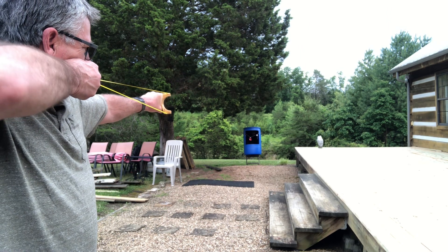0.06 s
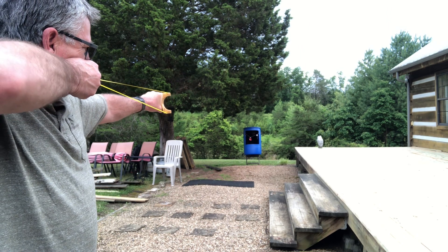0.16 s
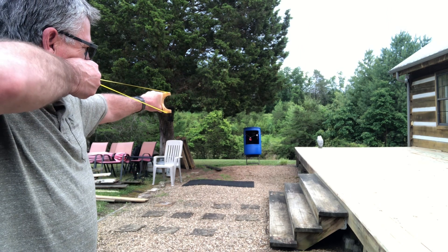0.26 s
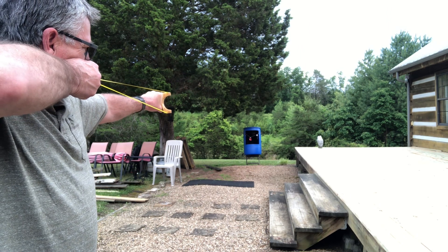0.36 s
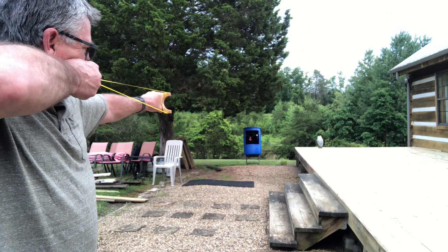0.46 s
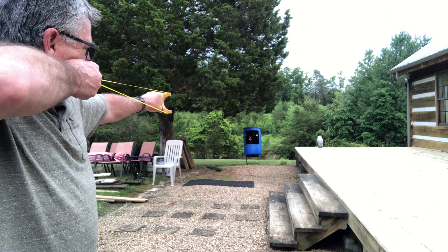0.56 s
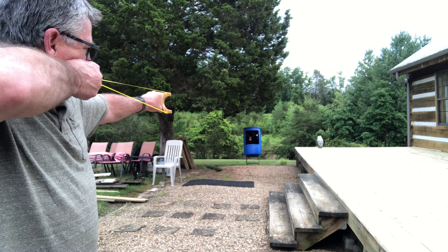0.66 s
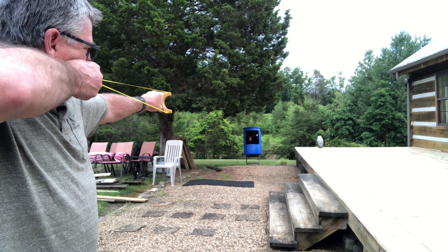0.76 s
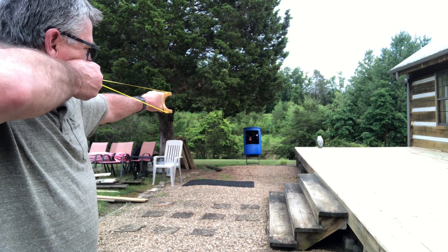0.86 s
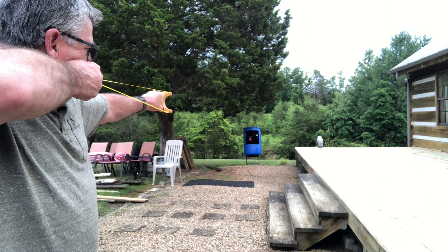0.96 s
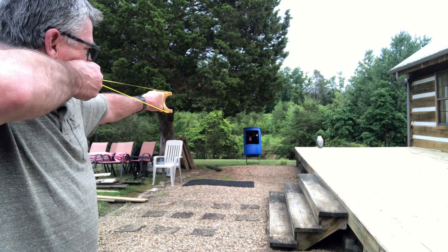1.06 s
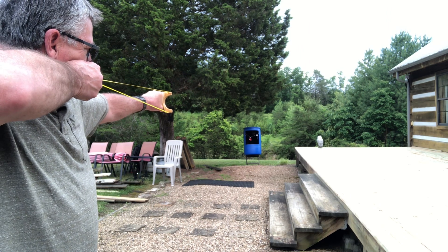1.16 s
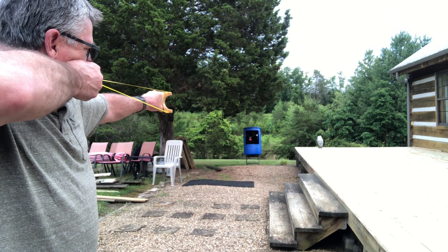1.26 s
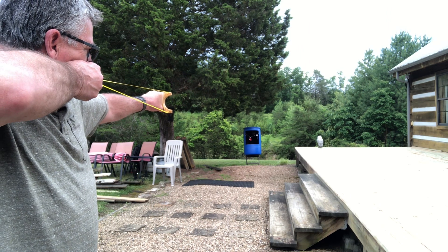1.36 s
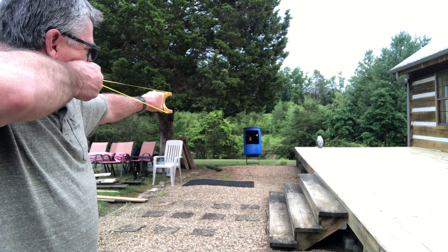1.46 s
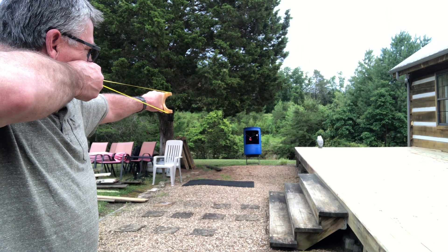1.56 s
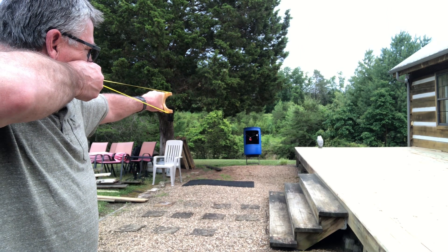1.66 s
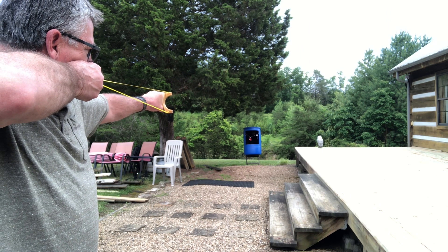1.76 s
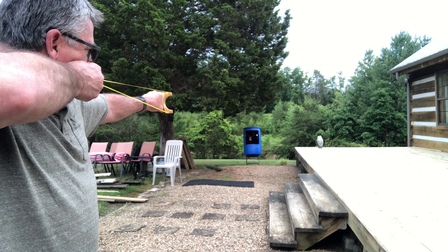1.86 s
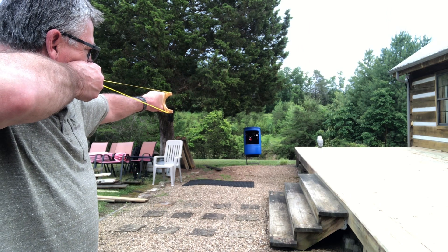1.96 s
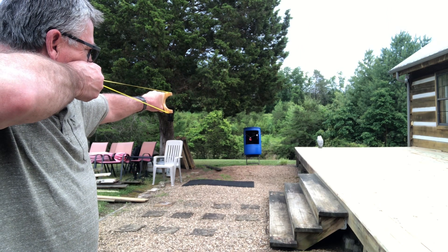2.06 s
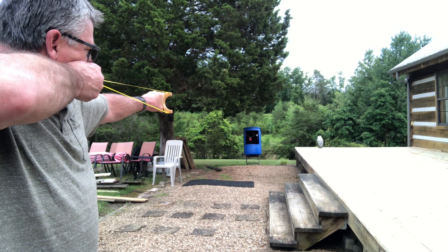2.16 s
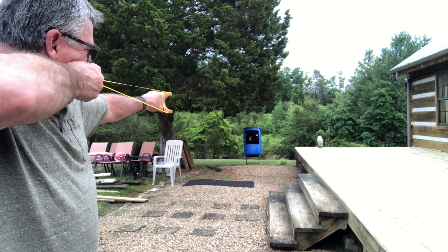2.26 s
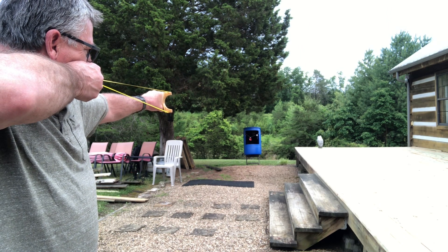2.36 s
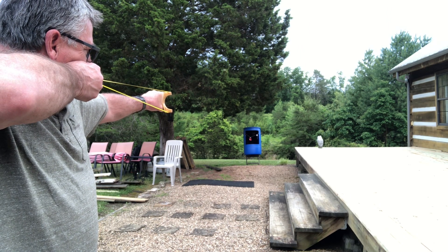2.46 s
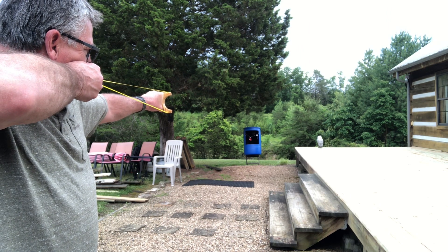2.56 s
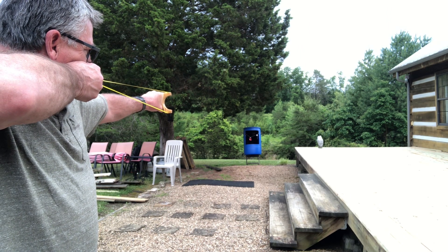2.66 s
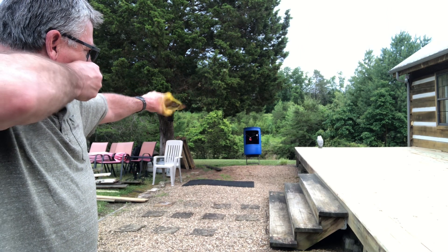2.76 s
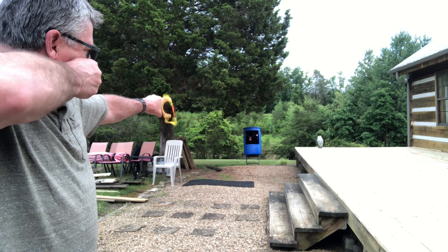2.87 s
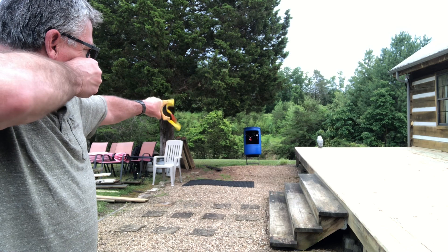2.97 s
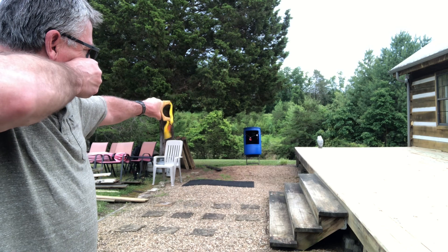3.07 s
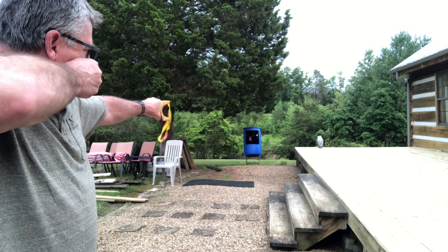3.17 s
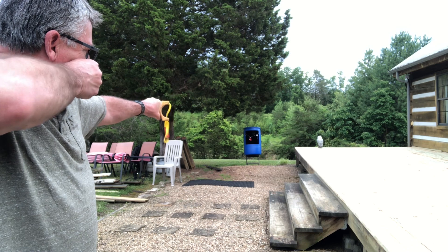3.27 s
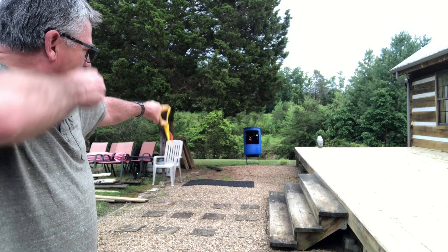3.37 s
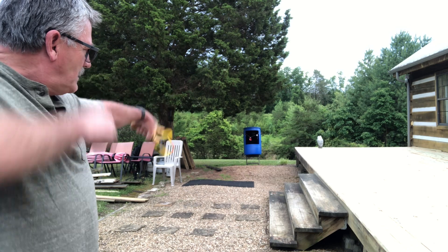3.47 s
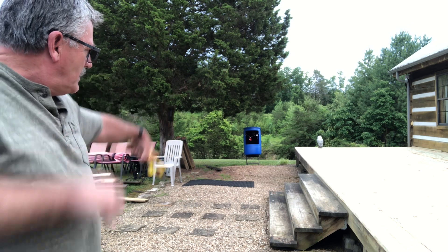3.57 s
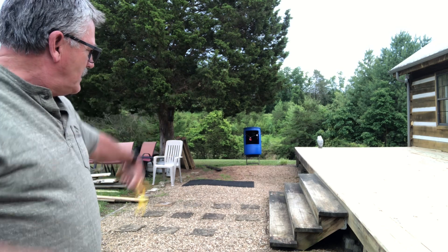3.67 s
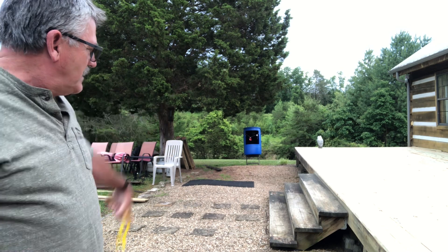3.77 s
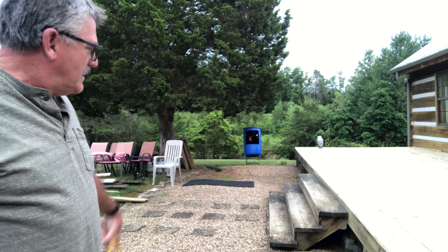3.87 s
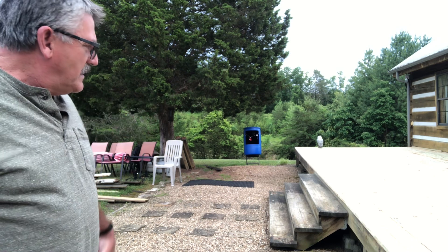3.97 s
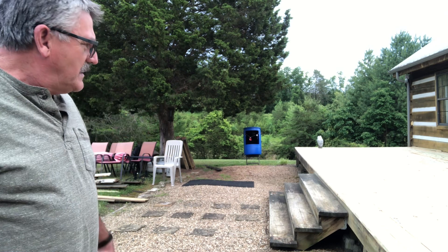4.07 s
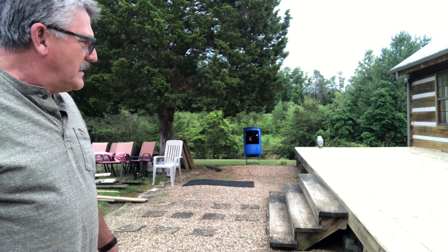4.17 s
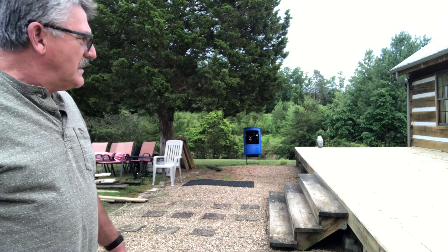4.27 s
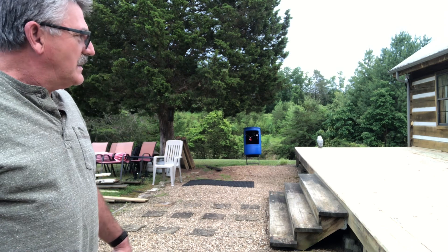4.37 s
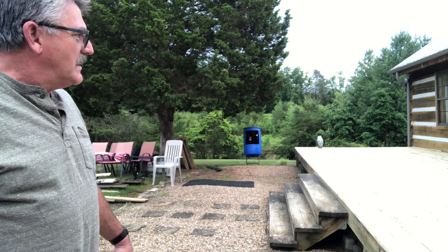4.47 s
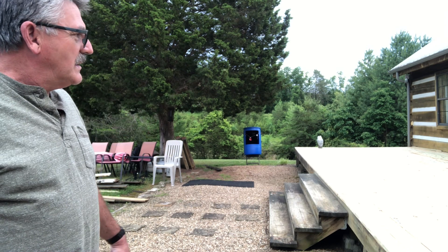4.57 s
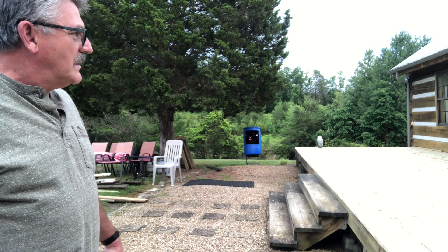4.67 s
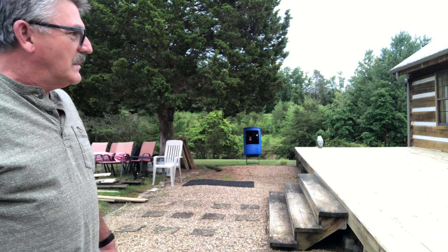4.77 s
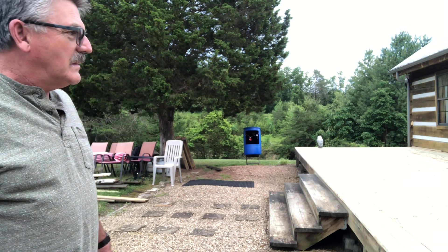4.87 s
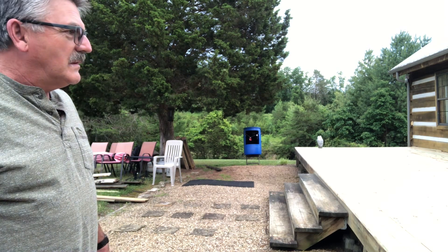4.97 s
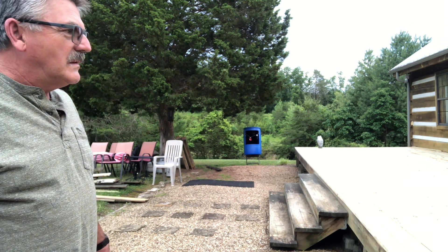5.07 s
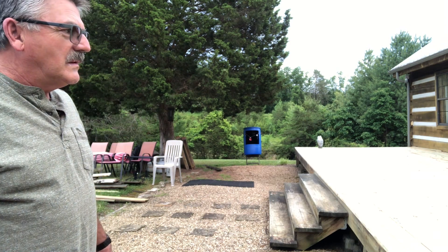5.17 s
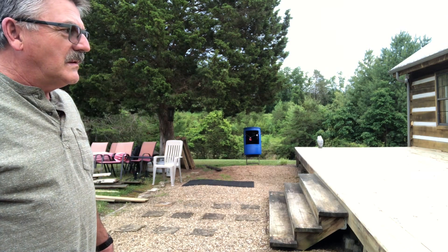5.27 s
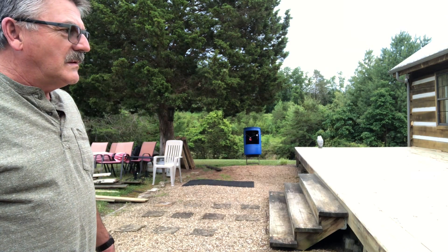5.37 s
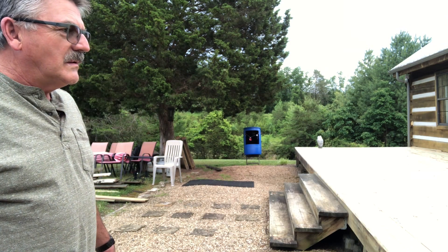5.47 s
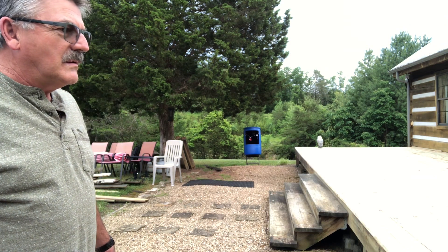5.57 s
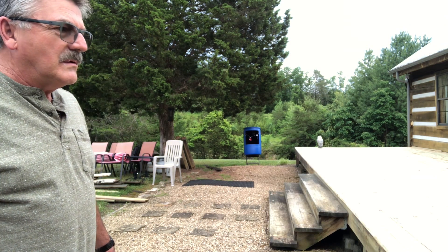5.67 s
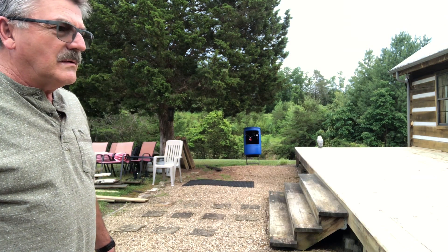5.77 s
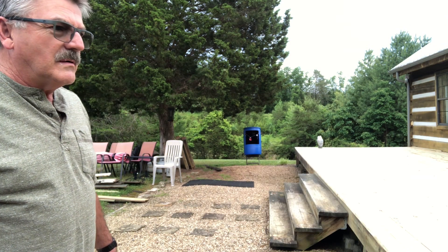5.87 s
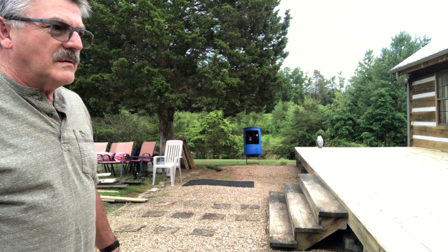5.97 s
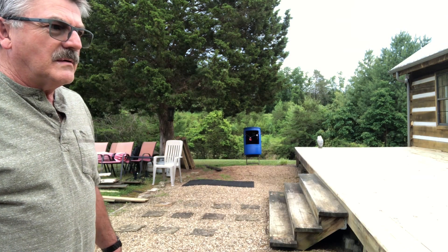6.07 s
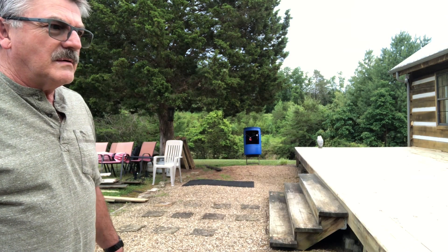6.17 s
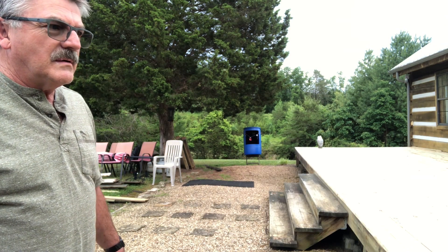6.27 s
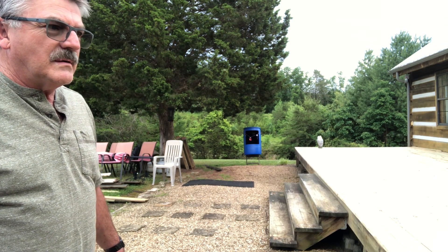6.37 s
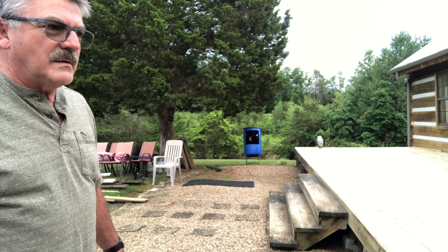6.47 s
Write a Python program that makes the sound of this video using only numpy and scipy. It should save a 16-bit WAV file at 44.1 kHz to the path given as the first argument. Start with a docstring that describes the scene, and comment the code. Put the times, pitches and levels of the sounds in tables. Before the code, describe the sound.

A faint insect drone, soft leaf hiss and a few bird calls fill a calm yard before a bird's buzzing trill. A whip-like rubber snap bursts out close to the microphone, followed a fraction of a second later by a loud, hollow plastic bang. Trees scatter the echo. Cloth brushes softly, while the ball ricochets in the barrel with irregular knocks, quickening bounces and short low rolls.

```python
"""Insects drone over a quiet wooded yard, with birds whistling and trilling and a far engine hum that dies away.
A slingshot is fired beside the microphone: its bands crack, flap and shudder as short bursts of coloured noise.
The steel ball slams into a plastic catch barrel some ten metres off, then bounces and rolls about in it;
the barrel is a dense noise ring plus sine modes. The trees echo the blow through a late, patchy noise response."""
import sys
import numpy as np
from scipy import signal
from scipy.fft import rfft, irfft
from scipy.io import wavfile
from scipy.ndimage import uniform_filter1d

SR = 44100
rng = np.random.default_rng(int(sys.argv[2]) if len(sys.argv) > 2 else 0)


def wav_out(sig):
    """Save sig, one row per channel (or a flat mono array), as 16-bit PCM at SR to the path in sys.argv[1]."""
    wavfile.write(sys.argv[1], SR, np.round(np.clip(np.atleast_2d(sig).T, -1, 1) * 32767).astype(np.int16))


N = 287973
TIME = np.arange(N) / SR  # s
TOP_HZ = 15900  # upper limit of the recorder

# Colour of the rubber's slap and swish. Each row: frequency in Hz, relative level in dB.
RUBBER_COLOUR = [(100, -19.5), (400, -4), (1200, -7.5), (2600, -9.5), (4500, 2), (5500, -10.5), (8000, -1),
                 (10000, 1.5), (11100, 0), (12500, 2.5), (15000, -7.5)]
# Spells of rolling on the barrel floor. Each row: start in seconds, end in seconds, rolling level in dB.
ROLLING_SPELLS = [(3.787, 3.918, -59), (4.579, 5.27, -59), (6.093, 6.53, -60.5)]


def undb(db):
    """Decibels to gain."""
    return 10 ** (np.asarray(db) / 20)


def unit(x):
    """Scale to rms 1."""
    return x / np.sqrt(np.mean(x ** 2) + 1e-30)


def across(rows, hz, axis=1):
    """One column of a table of frequencies, read on a log axis."""
    rows = np.array(rows)
    return np.interp(np.log(np.maximum(hz, 1)), np.log(rows[:, 0]), rows[:, axis])


def colour(x, rows):
    """Causal filter with a (Hz, dB) response, built from its cepstrum."""
    size = 4096
    gain = undb(across(rows, np.fft.rfftfreq(size, 1 / SR)))
    cepstrum = irfft(np.log(gain))
    # folding the cepstrum forward in time makes the filter minimum phase
    cepstrum[1:size // 2] *= 2
    cepstrum[size // 2 + 1:] = 0
    response = irfft(np.exp(rfft(cepstrum)))
    return signal.fftconvolve(x, response)[:len(x)]


def noise(rows):
    """Coloured noise of rms 1."""
    return unit(colour(rng.standard_normal(N), rows))


def walk(rate, size=N):
    """Random levels held 1 / rate s and slewed twice; spread near 1."""
    hold = int(SR / rate)
    steps = np.repeat(rng.standard_normal(size // hold + 1), hold)
    slewed = uniform_filter1d(uniform_filter1d(steps, hold), hold)
    return 1.3 * slewed[:size]


def add(out, s, x):
    """Mix x into out from time s on."""
    i = int(s * SR)
    out[i:i + len(x)] += x[:N - i]


def fade(t60, size=32768):
    """Exponential decay by 60 dB in t60 s."""
    return np.exp(-np.log(1000) * np.arange(size) / SR / t60)


def tone(hz):
    """A sine of rms 1 on a moving pitch."""
    return np.sqrt(2) * np.sin(2 * np.pi * np.cumsum(hz) / SR)


def crack(rows, t60, size=32768):
    """A decaying burst of random clicks, coloured, that starts near rms 1."""
    envelope = fade(t60, size=size)
    clicks = rng.choice([-1., 1.], size) * envelope
    return unit(colour(clicks, rows)) * np.sqrt(np.mean(envelope ** 2))


def ring(rows, size=32768):
    """Countless overlapping modes or echoes: each half octave builds up and dies at its own pace."""
    t, out = np.arange(size) / SR, 0
    spectrum = rfft(rng.standard_normal(size))
    bins = np.fft.rfftfreq(size, 1 / SR) + 1  # the 1 Hz keeps the logarithm finite
    for hz in 54 * 2 ** (np.arange(17) / 2):
        weight = np.clip(1 - 2 * np.abs(np.log2(bins / hz)), 0, 1)
        band = unit(irfft(spectrum * weight))
        rise = 1 - np.exp(-t / across(rows, hz, axis=2))
        decay = fade(across(rows, hz, axis=3), size=size)
        out = out + undb(across(rows, hz)) * band * rise * decay
    return out


def open_air(engine_hz=87.6, rumble_db=-66, murmur_db=-64.0, leaves_db=-73, gust_db=0.7,
             hold_s=1.3, fade_db_per_s=20):
    """A far engine hums and rumbles, then dies away; a low murmur and the faint hiss of the leaves stay."""
    # Harmonics of the far engine. Each row: multiple of the engine pitch, mean level in dB.
    hum_rows = [(1, -67.5), (2, -74), (3, -72.5)]
    # Low murmur of the open air, also the engine's rumble. Each row: frequency in Hz, relative level in dB.
    murmur_rows = [(20, -31.5), (45, -6.5), (90, 1.5), (160, 2), (300, -5.5), (700, -7), (1200, -16),
                   (2500, -28), (6000, -47.5)]
    # Hiss of the leaves. Each row: frequency in Hz, relative level in dB.
    leaf_rows = [(800, -8), (2000, -1.5), (2700, 4.5), (3600, 2), (5800, -5), (7300, -4.5), (8500, -9.5),
                 (9700, -6), (12000, -13.5), (15500, -11)]
    pitch = engine_hz * (1 + 0.0035 * walk(3.6))
    hum = sum(undb(db + 2 * walk(6.2)) * tone(round(k) * pitch) for k, db in hum_rows)
    dying = undb(-fade_db_per_s * np.maximum(TIME - hold_s, 0))
    engine = (hum + undb(rumble_db) * noise(murmur_rows)) * dying
    murmur = noise(murmur_rows) * undb(murmur_db + gust_db * walk(6.1))
    return engine + murmur + undb(leaves_db) * noise(leaf_rows)


def insects(db=-67.5, throb_db=1.25, swell_db=-1.0):
    """A chorus of far crickets merges into one shimmering band of noise."""
    # Band of the chorus. Each row: frequency in Hz, relative level in dB.
    chorus_rows = [(3300, -43), (3950, -25.5), (4300, -7), (4750, 0.5), (5050, -8.5), (5300, -24.5),
                   (5700, -39.5)]
    return noise(chorus_rows) * undb(db + throb_db * walk(45) + swell_db * walk(1.6))


def note(length, start_hz, end_hz, db, waver=0.01, flutter_db=2):
    """A whistled note that swells and fades while its glide levels off."""
    size = int(length * SR)
    progress = np.linspace(0, 1, size)
    pitch = start_hz + (end_hz - start_hz) * np.sin(np.pi / 2 * progress)
    level = undb(db + flutter_db * walk(120, size=size)) * np.sin(np.pi * progress)
    return level * tone(pitch * (1 + waver * walk(300, size=size)))


def trill(start_s=2.313, end_s=2.755, sweeps_per_s=53, slowing_hz_per_s=9, waver=0.016):
    """A bird's buzz of falling sweeps that slows a little as it goes."""
    # Its voices. Each row: top of the sweep in Hz, bottom in Hz, level in dB before the foliage.
    voice_rows = [(3020, 2780, -51), (3700, 3050, -57.5), (5320, 4700, -56.5), (4700, 3500, -63)]
    age = TIME - start_s
    sweep = (sweeps_per_s - slowing_hz_per_s * age / 2) * age % 1
    sounding = (TIME > start_s) & (TIME < end_s)
    voices = 0
    for top_hz, bottom_hz, db in voice_rows:
        pitch = top_hz + (bottom_hz - top_hz) * sweep
        voices = voices + undb(db) * tone(pitch * (1 + waver * walk(500)))
    return np.sin(np.pi * sweep) ** 4 * sounding * voices


def birds(direct_db=-3.5, wood_db=-4.0, trill_db=-4, trill_wood_db=-3.0, wood_t60=0.71):
    """A repeated phrase, chips, single notes and a trill, smeared by the foliage's decaying scatter."""
    # The whistler's phrase, a soft dip and two rises. Each row: seconds after its start, length in seconds,
    # start in Hz, end in Hz, level in dB before the song's level and the foliage.
    phrase_rows = [(0, 0.09, 2525, 2460, -63), (0.163, .14, 2580, 2683, -55),
                   (0.383, .14, 2550, 2720, -54.5)]
    # Each time it is sung. Each row: start in seconds, time stretch as a factor, level change in dB.
    song_rows = [(1.779, 1.05, -2), (4.57, 1, -1)]
    # Single notes and chips, some beside the phrase or leading into the trill. Each row: start in seconds,
    # length in seconds, start in Hz, end in Hz, level in dB before the foliage.
    note_rows = [(0.174, 0.057, 2900, 2175, -65.5), (.98, 0.11, 3370, 3530, -74),
                 (1.08, 0.47, 2734, 2840, -72.5), (1.397, .3, 2790, 2640, -73),
                 (1.98, 0.074, 3530, 3520, -66), (2.004, 0.021, 1336, 1487, -60.5),
                 (2.087, .04, 2534, 2380, -58), (2.176, 0.013, 3630, 3330, -45.5),
                 (2.243, 0.024, 1960, 2050, -60), (2.273, 0.017, 3600, 3336, -48),
                 (4.856, 0.057, 2750, 2700, -59.5), (5.155, 0.243, 2740, 2640, -71.5),
                 (5.44, 0.066, 448, 482, -56), (6.06, .045, 3960, 4200, -60.5)]
    calls, buzz = np.zeros(N), trill()
    for start, stretch, song_db in song_rows:
        for s, length, start_hz, end_hz, db in phrase_rows:
            add(calls, start + stretch * s, note(stretch * length, start_hz, end_hz, db + song_db))
    for pair_s in (0.06, 1.335):
        for s in (pair_s, pair_s + 0.1):  # thin rising chips
            add(calls, s, note(length=0.01, start_hz=7016, end_hz=7616, db=-69.5))
    for s, *shape in note_rows:
        add(calls, s, note(*shape))
    decay = fade(wood_t60)
    foliage = rng.standard_normal(len(decay)) * decay
    sent = undb(wood_db) * calls + undb(trill_wood_db) * buzz
    smear = signal.fftconvolve(sent, foliage / np.linalg.norm(foliage))[:N]
    return undb(direct_db) * calls + undb(trill_db) * buzz + smear


def tree_echo(x, delay_s=0.055, patchy_db=1.5, stand_t60=.3):
    """The edge of the wood throws a loud sound back late, in scattered clumps."""
    # Echo of the trees and the cabin. Each row: frequency in Hz, level in dB per half octave,
    # rise in seconds, t60 in seconds.
    wood_rows = [(89.6, -81, 0.024, 0.28), (301, -75, .02, 0.37), (1000, -73, 0.1, 1), (2400, -69, 0.02, 1),
                 (4400, -71, 0.036, 0.96), (6500, -66, 0.023, 0.51), (9950, -66.5, 0.0068, .66),
                 (15000, -76.5, 0.011, .4)]
    # Separate stands of trees that answer more clearly. Each row: delay in seconds, level in dB.
    stand_rows = [(.11, -34), (.195, -38)]
    # Colour of those stands. Each row: frequency in Hz, relative level in dB.
    stand_colour = [(300, -13.5), (1500, -7.5), (3000, -1), (4400, 1.5), (6000, -9), (12000, -13)]
    response, wood = np.zeros(2 * SR), ring(wood_rows)
    add(response, delay_s, wood * undb(patchy_db * walk(44.7)[:len(wood)]))
    for s, db in stand_rows:
        scatter = crack(stand_colour, stand_t60)
        add(response, s, undb(db) * scatter / np.linalg.norm(scatter))
    return signal.fftconvolve(x, response)[:N]


def brushes_and_clicks(flutter_db=4.0):
    """Cloth brushes softly as the arms drop; there are a few short clicks, one just before the slam."""
    # Brushes of the shirt. Each row: middle in seconds, half length in seconds, mean level in dB.
    brush_rows = [(3.59, 0.13, -71.5), (3.957, 0.24, -74), (4.702, 0.24, -77)]
    # Short clicks. Each row: start in seconds, level in dB.
    click_rows = [(2.9374, -43.5), (2.9523, -31), (4.06, -46), (4.446, -45.5), (4.855, -41.5)]
    cloth_colour = [(3000, 2.0), (7000, -6.5), (10500, 1.0), (12000, -9), (15000, -15)]  # Hz, dB
    click_colour = [(200, -3.5), (1000, 3.5), (3500, 6.5), (6000, -5.0), (10000, -6.5), (15000, -33.5)]
    brushes = sum(undb(db) * np.exp(-((TIME - s) / half) ** 2) for s, half, db in brush_rows)
    out = noise(cloth_colour) * brushes * undb(flutter_db * walk(34))
    for s, db in click_rows:
        add(out, s, undb(db) * crack(click_colour, t60=0.0097))
    return out


def wall_modes(scatter_db=1.0, rise_s=0.024, size=32768):
    """Each spot on the wall shares a blow differently among modes that swell as waves run round the barrel."""
    # Strongest modes of the barrel wall. Each row: frequency in Hz, mean level in dB before the swell,
    # t60 in seconds.
    mode_rows = [(93.8, -42.5, 0.63), (127.3, -47, 0.5), (171.4, -41.5, 0.31), (230, -35, 0.23),
                 (376.1, -25.5, 0.18), (466.5, -27.5, 0.13), (548.2, -26.5, 0.14), (601, -28.5, 0.15),
                 (637, -30.5, 0.15), (699, -27, 0.15), (771.5, -16, 0.087), (833, -30.5, 0.19),
                 (922, -26, 0.14), (984, -27, 0.07), (1292.6, -19, 0.083), (1447, -25, 0.088),
                 (1510, -26, 0.097), (1730, -30, 0.12), (2470, -27.5, .09), (3560, -26, 0.17),
                 (4113, -26, 0.18)]
    t, modes = np.arange(size) / SR, 0
    for hz, db, t60 in mode_rows:
        level = undb(db + scatter_db * rng.standard_normal())
        modes = modes + level * fade(t60, size=size) * np.sin(2 * np.pi * (hz * t + rng.random()))
    return modes * (1 - np.exp(-t / rise_s))


def blow(db, bass_db, treble_db, crack_db, crack_level_db=-6, crack_t60=0.015, modes_db=0,
         full_contact_hz=16560, halving_db=12):
    """A blow cracks and rings the barrel; a slower ball stays longer in contact and sounds duller."""
    # The barrel's dense ring. Each row: frequency in Hz, level in dB per half octave before the blow's
    # own level and colour, rise in seconds, t60 in seconds.
    barrel_rows = [(53.85, -78, .03, 0.56), (100, -52, .04, 0.43), (150, -48, 0.021, 0.11),
                   (244, -39, .004, .21), (416.5, -29.5, 0.006, 0.22), (789, -26.5, 0.0012, 0.19),
                   (1400, -30.5, .003, 0.14), (2240, -29, 0.00087, 0.16), (4186, -21.5, .002, 0.15),
                   (6130, -30.5, .002, 0.15), (9610, -23, 0.0019, 0.19), (14900, -44, 0.0024, .15)]
    # Colour of the first crack of contact. Each row: frequency in Hz, relative level in dB.
    contact_colour = [(200, -21.5), (550, -6.5), (1000, 3), (1700, -5), (3000, 4.5), (4100, 9.5),
                      (5600, -1), (9000, 4), (11000, 1.5), (15000, -10.5)]
    sound = ring(barrel_rows) + undb(modes_db) * wall_modes()
    sound = sound + undb(crack_level_db + crack_db) * crack(contact_colour, crack_t60)
    sound = colour(sound, [(430, bass_db), (750, 0.0024), (1300, 0.005), (3500, treble_db)])
    # the cut-off halves for every halving_db by which the blow's level plus half its treble lift is weaker
    contact_hz = full_contact_hz * 2 ** ((db + treble_db / 2) / halving_db)
    contact = signal.butter(3, min(contact_hz, TOP_HZ), fs=SR, output="sos")
    return undb(db) * signal.sosfilt(contact, sound)


def roll_gain(attack_s=0.014, release_s=0.069, slowing_db_per_s=3.5):
    """Each spell of rolling sets in, weakens steadily as the ball slows, and dies out."""
    out = np.zeros(N)
    for start, end, db in ROLLING_SPELLS:
        age = np.maximum(TIME - start, 0)
        attack = 1 - np.exp(-age / attack_s)
        release = np.exp(-np.maximum(TIME - end, 0) / release_s)
        out += undb(db - slowing_db_per_s * age) * attack * release
    return out


def ball_roll(bumps_per_s=90, rumble_db=-3):
    """The rolling ball drums over small bumps in the plastic."""
    # Colour of the rolling. Each row: frequency in Hz, relative level in dB.
    floor_colour = [(100, -7), (250, -5.5), (400, 4), (466, 5.5), (530, 1), (800, -2.5), (1400, -10),
                    (2500, -31), (4000, -27), (7000, -44)]
    bumps = (rng.random(N) < bumps_per_s / SR) * rng.standard_normal(N)
    drumming = signal.fftconvolve(bumps, crack(floor_colour, t60=0.066))[:N]
    return unit(unit(drumming) + undb(rumble_db) * noise(floor_colour)) * roll_gain()


def ball_skips(skips_per_s=17, skip_db=-37, scatter_db=4, count=24):
    """While it rolls, the ball hops at uneven moments and lands with a light knock."""
    taps = np.zeros(N)
    for start, end, _ in ROLLING_SPELLS:
        for k, (place, strength) in enumerate(rng.random((count, 2))):
            s = start + (k + place) / skips_per_s
            if s < min(end, TIME[-1]):
                taps[int(s * SR)] = undb(scatter_db * (2 * strength - 3.5))
    knock = blow(skip_db, bass_db=0, treble_db=-3, crack_db=2)
    return signal.fftconvolve(taps, knock)[:N]


def ball_hits(count=3):
    """The ball strikes the walls, and twice runs into bounces, each flight shorter and each landing weaker."""
    # Ball on the barrel, the slam and its ricochets first. Each row: start in seconds, level in dB,
    # bass lift in dB, treble lift in dB, crack lift in dB.
    hit_rows = [(2.9578, -6.5, -5, 3, 6), (2.96, -9, -12, -9, 3), (2.9678, -6, 2, 1.5, -2),
                (2.975, 0.5, 3, -3.5, -29), (3.0042, -13.5, -8, -2, -7.5), (3.467, -18.5, -2, -10, -19),
                (3.515, -32, 11.5, -8, -8), (3.8133, -20, 5.5, -2.5, 2.5), (3.841, -29.5, 10.5, 14.5, -13),
                (3.932, -29.5, -12, -12, 1), (4.004, -27, 3.5, -6.5, -1), (4.171, -22.5, 2, -9, -4.5),
                (4.521, -31, -5, -6, -4), (4.663, -27.5, -8, -12, 7.5), (4.738, -33.5, 4.5, -9, -4),
                (4.892, -33, -1, -5, -2), (5.064, -33.5, 0, -5, 0), (5.097, -37, -10, 6.5, 2.5),
                (5.251, -38.5, -2, 8.5, 0), (5.291, -25, 3, 0, 6), (6.11, -31, 5, -11, -8),
                (6.316, -39.5, 6.5, -3, -9.5)]
    # Runs of bounces. Each row: start in seconds, first flight in seconds, share of speed kept, first level
    # in dB, loss per bounce in dB, bass lift in dB, treble lift in dB, crack lift in dB.
    bounce_rows = [(4.3341, .0874, .675, -25.5, 4.5, -2, -12, 1),
                   (5.7224, .191, .533, -17.5, 3.8, 7, -3, 2.5)]
    out = np.zeros(N)
    for s, db, bass_db, treble_db, crack_db in hit_rows:
        add(out, s, blow(db, bass_db, treble_db, crack_db))
    for s, flight, kept, db, loss_db, bass_db, treble_db, crack_db in bounce_rows:
        for k in range(count):
            add(out, s, blow(db - k * loss_db, bass_db, treble_db, crack_db))
            s = s + flight * kept ** k
    return out


def slap(treble_db, t60):
    """One crack of rubber, tilted brighter or duller."""
    return colour(crack(RUBBER_COLOUR, t60, size=4096), [(2000, -treble_db / 2), (10000, treble_db / 2)])


def flapping(start_s=2.775, db=-22, flaps_per_s=260, fall_db_per_s=260, scatter_db=3, treble_db=4,
             flap_t60=0.0062, count=14):
    """The slack bands slap each other lightly and unevenly as they lose their swing."""
    out = np.zeros(N)
    for k, (place, strength) in enumerate(rng.random((count, 2))):
        age = (k + place) / flaps_per_s
        flap_db = db - fall_db_per_s * age + scatter_db * (2 * strength - 1)
        add(out, start_s + age, undb(flap_db) * slap(treble_db, flap_t60))
    return out


def slingshot(release_s=2.757, release_db=-31.0, swish_db=-31, swish_s=2.7725, swish_rise_s=0.0057,
              shudder_s=2.7725, slap_t60=0.0041):
    """The pouch slips free; the bands swish forward, crack like a whip at the fork, then flap and shudder."""
    # Main slaps of the bands and pouch. Each row: start in seconds, level in dB, treble lift in dB.
    slap_rows = [(2.7724, -2, 4), (2.7796, -18, 1), (2.7914, -7, -4), (2.798, -15, 1.5)]
    # The slack rubber shuddering after the shot. Each row: frequency in Hz, level in dB per half octave,
    # rise in seconds, t60 in seconds.
    shudder_rows = [(70.2, -55.5, .01, 0.22), (201.3, -40.5, 0.0062, 0.094), (505.7, -39, .004, 0.24),
                    (999, -47.5, .004, 0.22), (2384, -48, .003, 0.23), (4400, -41.5, .004, 0.37),
                    (5996, -46, 0.0033, .22), (9800, -25.5, 0.0022, 0.1), (15000, -42, .003, 0.19)]
    out = flapping()
    add(out, release_s, undb(release_db) * slap(treble_db=-15, t60=.03))
    for s, db, treble_db in slap_rows:
        add(out, s, undb(db) * slap(treble_db, slap_t60))
    add(out, shudder_s, ring(shudder_rows))
    swish = np.exp(-np.abs(TIME - swish_s) / swish_rise_s) * noise(RUBBER_COLOUR)
    return out + undb(swish_db) * swish


def scene(snap_echo_db=-14):
    """The near slingshot is almost dry; the far barrel carries more of the echo."""
    snap, hits = slingshot(), ball_hits()
    echo = tree_echo(hits + undb(snap_echo_db) * snap)
    yard = open_air() + insects() + birds()
    barrel = hits + ball_roll() + ball_skips()
    return (yard + echo + brushes_and_clicks() + barrel + snap)[None]


def record(dry):
    """The recorder rounds the highest peaks and cuts the top."""
    top_cut = signal.ellip(10, .2, 70, TOP_HZ, fs=SR, output="sos")
    return signal.sosfilt(top_cut, np.tanh(dry))


dry = scene()
out = record(dry)
wav_out(out)
```